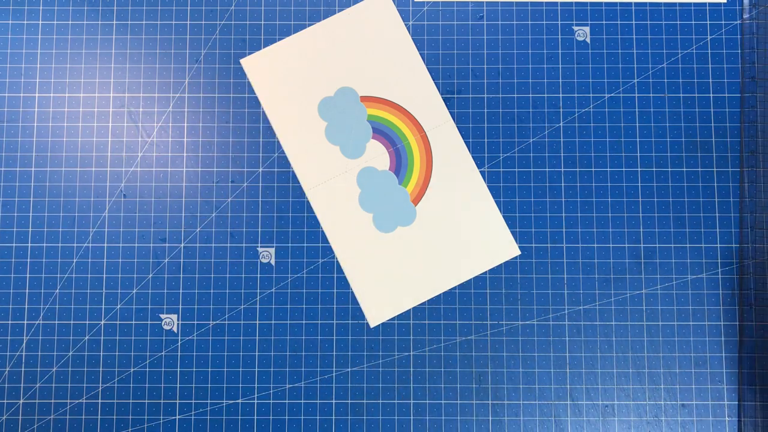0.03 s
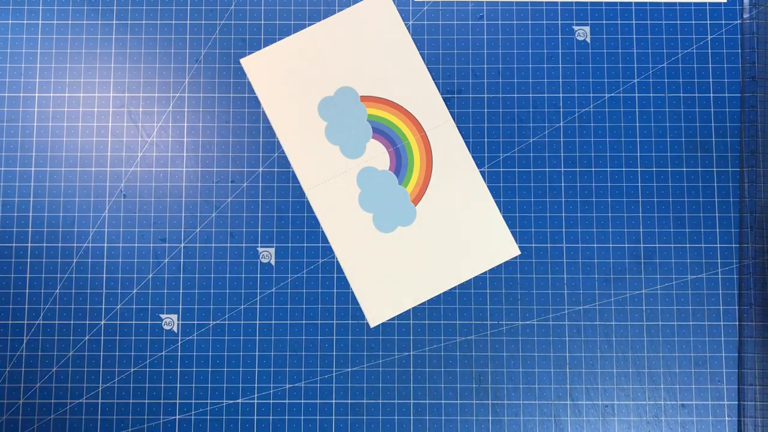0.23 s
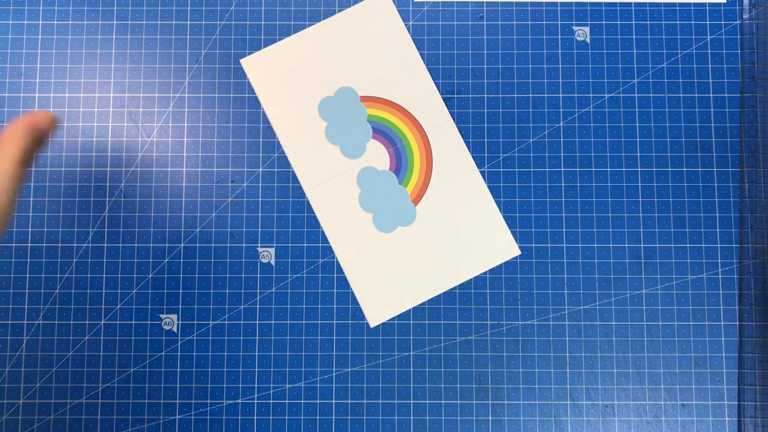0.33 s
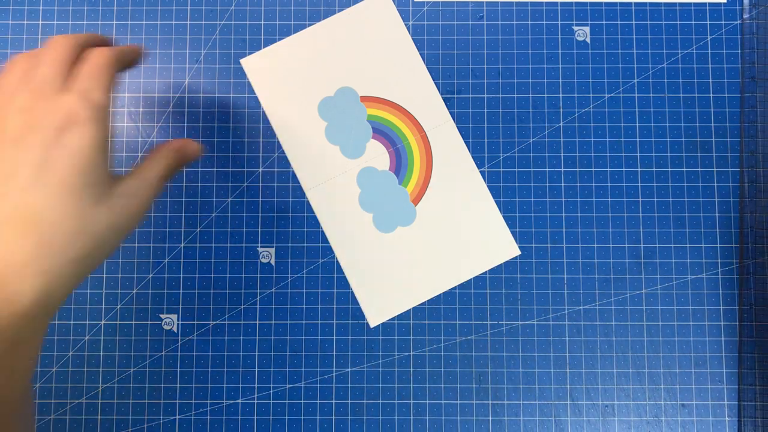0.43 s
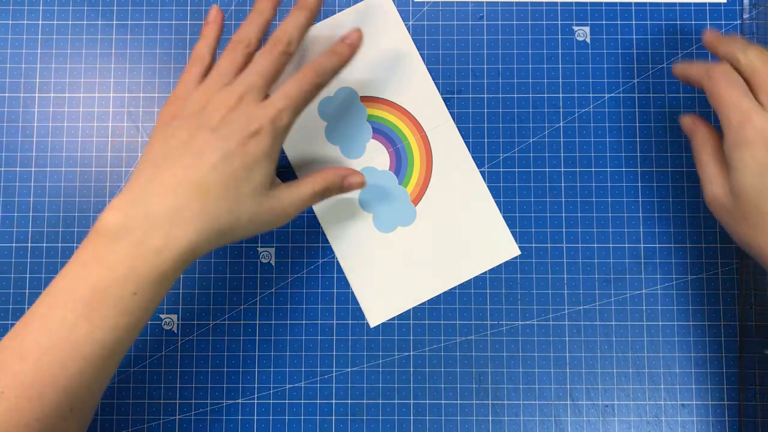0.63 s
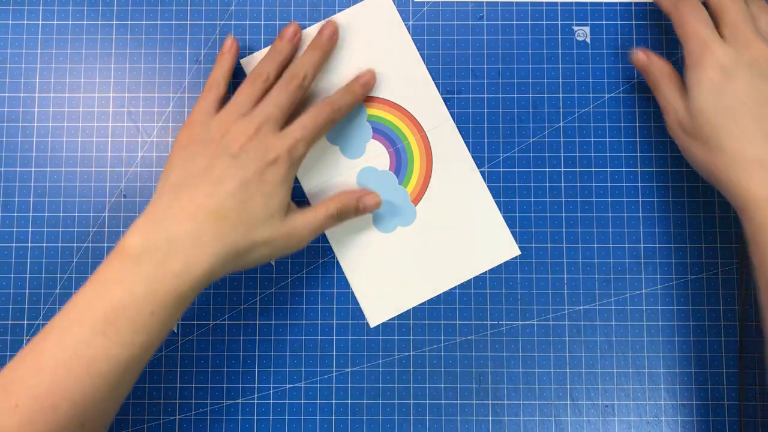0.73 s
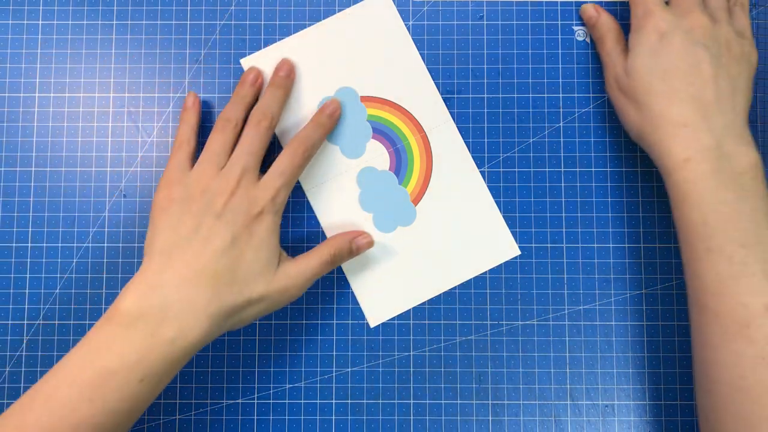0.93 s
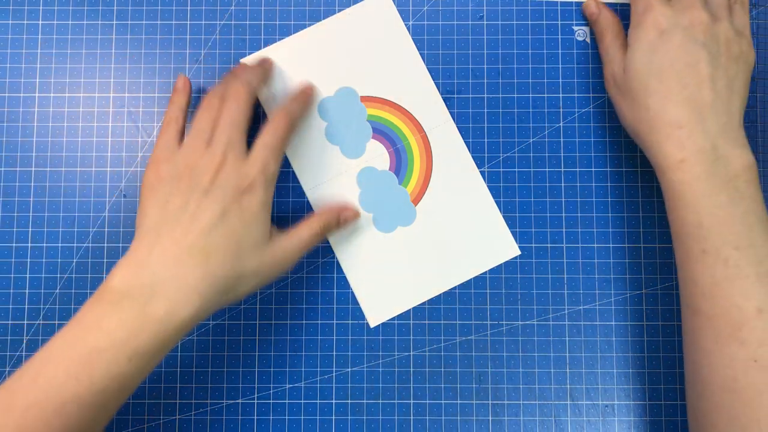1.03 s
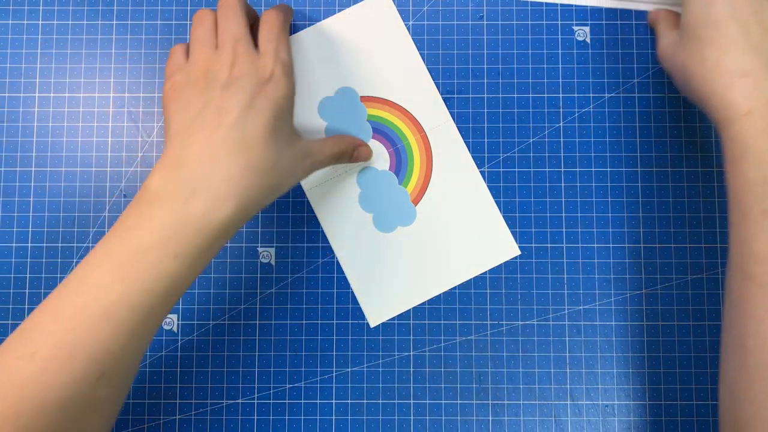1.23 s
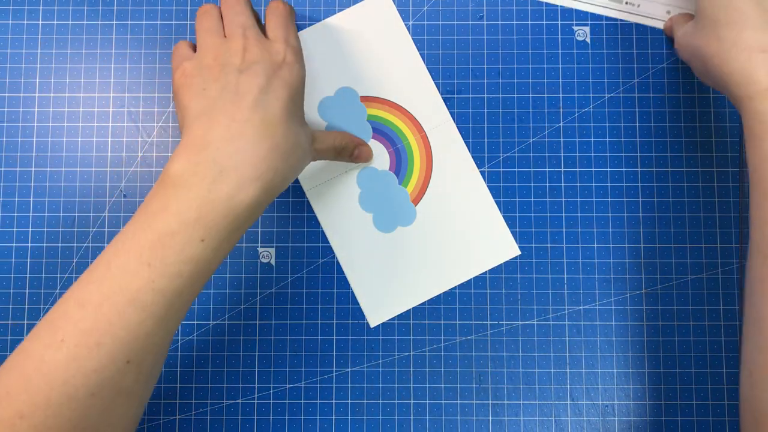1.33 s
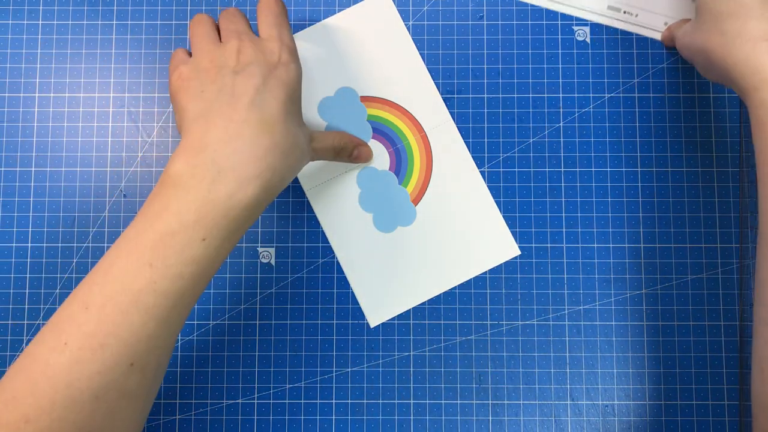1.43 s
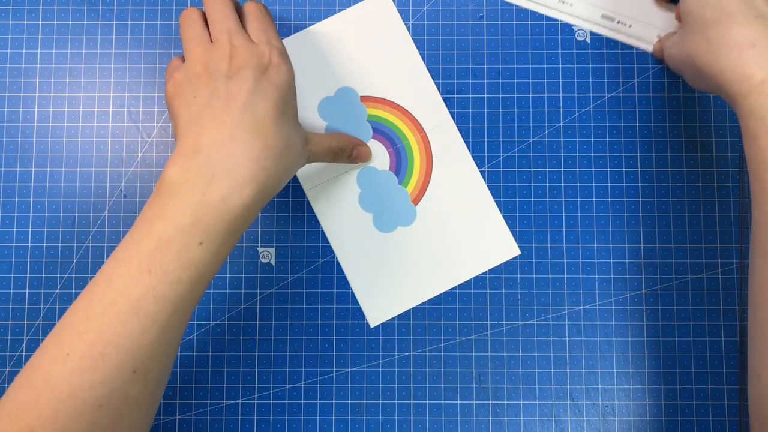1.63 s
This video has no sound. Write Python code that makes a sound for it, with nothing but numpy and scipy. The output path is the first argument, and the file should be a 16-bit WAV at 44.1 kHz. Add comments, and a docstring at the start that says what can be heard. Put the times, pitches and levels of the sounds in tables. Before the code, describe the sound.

A small hard object clicks in the fingers at 0.2 seconds, after a faint shuffle, snaps sharply onto a desk at 0.3 and settles with light taps around 0.4. From 0.8 a hand glides faintly over paper. From 1.2 to 1.7 a second sheet slides across a cutting mat, softly rustling and ticking. The microphone is close, with a low rumble in the small quiet room.

```python
"""A faint shuffle, then a small hard object clicks in the fingers, snaps down on the desk and settles.
The microphone is close above a cutting mat in a small quiet room. Each contact is a short crack;
the hardest set object and desk ringing. A hand then slides over a sheet of paper and a second sheet
is drawn in, its friction rustling, the paper ticking as it flexes. A low room rumble lies under it all."""
import sys
import numpy as np
from scipy import signal
from scipy.fft import rfft, irfft, next_fast_len
from scipy.io import wavfile
from scipy.ndimage import uniform_filter1d, map_coordinates

SR = 44100
rng = np.random.default_rng(int(sys.argv[2]) if len(sys.argv) > 2 else 0)


def to_wav(sig):
    """Store sig (one row per channel, or 1-D mono) as 16-bit WAV at the path in sys.argv[1].

    Samples outside -1..1 are clipped; the rate is SR.
    """
    pcm = np.clip(np.atleast_2d(sig), -1, 1) * 32767
    pcm = np.round(pcm).astype(np.int16)
    wavfile.write(sys.argv[1], SR, pcm.T)  # frames by channels


N = 74970

RUMBLE_COLOUR = [(25, -36.5), (45, -14.5), (65, -3), (95, -5), (160, -11.5), (255, -12.5), (400, -21),
                 (750, -30.5), (1500, -31), (3200, -35.5), (5300, -46), (15500, -46)]  # room tone: f/Hz, level/dB
ROOM_DECAY = [(150, 0.25), (400, 0.057), (1200, 0.15), (15000, 0.12)]  # reverberation of the small room: f/Hz, t60/s
# object, hands and arms bump the desk softly: t/s, level/dB, f/Hz, t60/s
DESK_BUMPS = [(0.212, -51, 83.4, 0.2), (0.2249, -36.5, 400, .035), (.2245, -37.5, 750.5, .024),
              (0.421, -54.5, 61, 0.44), (.485, -55, 63, 0.26), (0.504, -55, 436, 0.14),
              (.815, -45, 58.06, 0.11), (0.992, -57, 93.84, 0.36), (1.2266, -52, 288, .07),
              (1.327, -51.5, 302, 0.052), (1.356, -49, 259.3, 0.18), (1.357, -37.5, 450, 0.012),
              (1.449, -52, 55, .15), (1.558, -55.5, 416, 0.15)]

# Four rubbing sounds, each a stroke (t/s, level/dB) and a colour (f/Hz, level/dB).
# hand and paper shuffle on the mat
SHUFFLE_STROKE = [(0, -62.5), (.04, -66), (.07, -65), (.08, -52), (.11, -53), (.13, -61.5), (.147, -52.5),
                  (.17, -58.5), (.185, -59), (.21, -59.5), (.3, -75), (.43, -61.5), (.52, -70.5),
                  (.58, -80)]
SHUFFLE_COLOUR = [(120, -35), (230, -16), (310, 0), (490, -15), (585, -1.5), (840, -9), (1300, -14),
                  (1550, -11), (2300, -21.5), (3300, -15.5), (6600, -18), (7600, -22.5), (15500, -29.5)]
# fingers glide on paper
GLIDE_STROKE = [(.78, -92.5), (.81, -65), (.87, -60), (.94, -59.5), (1.03, -67), (1.1, -66.5), (1.2, -71),
                (1.3, -90.5)]
GLIDE_COLOUR = [(880, -39.5), (1500, -18), (2570, -14), (4310, -7.5), (4660, -8), (6960, -5), (7670, -9),
                (9330, -5.5), (15500, -1.5)]
# the second sheet scrapes dully
SCRAPE_STROKE = [(1.2, -93), (1.23, -65), (1.3, -63), (1.36, -64.5), (1.41, -65.5), (1.44, -70.5),
                 (1.465, -60.5), (1.49, -69), (1.515, -58), (1.54, -64.5), (1.57, -63.5), (1.65, -68),
                 (1.69, -58.5)]
SCRAPE_COLOUR = [(100, -14.5), (240, 0), (430, -5), (800, -18), (1400, -11), (2500, -18.5), (3700, -17),
                 (6000, -26), (15000, -39)]
# it hisses as it skims the mat
SKIM_STROKE = [(1.2, -81), (1.27, -71), (1.32, -62.5), (1.36, -58), (1.42, -70), (1.47, -69),
               (1.515, -57.5), (1.55, -68.5), (1.585, -62), (1.63, -81.5), (1.7, -72.5)]
SKIM_COLOUR = [(1500, -25.5), (4500, -6.5), (7000, -8.5), (10500, -8), (12500, -1), (14000, -3),
               (15500, -3.5)]

# paper ticks and finger taps: t/s, level/dB at each of the four TICK_BANDS, t60/s
PAPER_TICKS = [(.075, -47, -47.5, -46, -52, 0.026), (0.8083, -70, -62, -60.5, -49.5, 0.022),
               (1.2265, -48, -55, -65, -74, .03), (1.326, -39, -50, -52, -63, 0.033),
               (1.3566, -43, -50, -54, -53, 0.011), (1.3746, -38, -52, -45.5, -54, 0.045),
               (1.4569, -39.5, -47, -53, -50.5, 0.028), (1.5594, -55, -55, -56, -68, 0.033),
               (1.5823, -50, -48.5, -45, -48, .015), (1.6862, -47, -54.5, -59.5, -55, .02)]
TICK_BANDS = [300, 1400, 4300, 11000]  # f/Hz
SHEET_COLOUR = [(40, -16), (150, -3), (300, 4.5), (850, -1), (1250, 5), (2400, -4), (3750, 1), (4350, 7),
                (5300, -5), (11000, -2)]  # the sheet's own colour, added to each tick: f/Hz, level/dB
PAPER_PINGS = [(.549, -48.5, 3090), (.659, -59, 3150), (.709, -51.5, 3149), (1.3754, -41.5, 4270),
               (1.5825, -43, 4060)]  # narrow pings of flexed paper: t/s, level/dB, f/Hz

# light, papery taps as the object settles: t/s, level/dB, tilt/(dB per octave)
SETTLING_TAPS = [(0.4045, -34.5, -0.5), (.408, -41.5, -5), (0.4217, -31, -1.5), (0.4250, -37.5, -3),
                 (0.433, -44, -2.5)]
TAP_COLOUR = [(100, -26), (450, -7), (880, -20), (1280, -5.5), (2100, -7.5), (3130, 0.5), (4150, -0.5),
              (5400, -6), (8100, 2.5), (9800, -7.5), (16000, -6)]  # f/Hz, level/dB
# hollow clack of the object in the fingers: t/s, level/dB, tilt/(dB per octave)
FINGER_CLICKS = [(0.2109, -53, -4.5), (0.2222, -18.5, -1.5), (.2258, -29, -2), (.2318, -35, -2)]
CLICK_COLOUR = [(100, -18), (260, -14), (390, -6.5), (530, -13), (750, -5), (930, -12.5), (1400, -25.5),
                (1680, -4), (1880, -15.5), (2100, -6.5), (2380, -12), (2900, 0), (3650, -5.5), (4200, 5),
                (4900, -1), (5500, -11.5), (6100, -2.5), (7200, 1), (9500, -5.5), (16000, -10.5)]  # f/Hz, level/dB
# the object strikes the desk: t/s, level/dB, thump/dB, tilt/(dB per octave)
DESK_KNOCKS = [(0.2885, -18, -3, -2.5), (.2902, -10.5, -3, 0), (0.2933, -20.5, -3, 1.5),
               (0.3297, -30, 8.5, -1.5), (0.335, -28.5, -7, 2)]
KNOCK_COLOUR = [(40, -27), (130, -13.5), (285, -7), (345, 3), (450, -4.5), (590, 3.5), (830, -4.5),
                (1070, 3), (1350, -2.5), (1600, -1.5), (2050, -6.5), (2660, 4.5), (3000, -2.5), (3300, 3),
                (3900, -2.5), (5100, 3), (5800, -2.5), (7700, -3), (10000, -.5), (16000, -10)]  # f/Hz, level/dB
# what object and desk ring with: f/Hz, relative level/dB, t60/s
DESK_MODES = [(150, -18.5, .14), (225, -10.5, 0.099), (340.3, -5, .135), (365.3, -10.5, .15),
              (583, -5.5, 0.072), (780.3, -7.5, .07), (1053, -12, 0.092), (1154, -9.5, .1), (1617, -13, .1),
              (2642, 1.5, .1), (3200, -5.5, .09), (3650, -6, 0.12), (4350, -6, .12), (5240, -4, 0.15)]

FILTER_SIZE, GRAINS_PER_S = 8192, 2100


def amp(db):
    """Decibels to gain."""
    return 10 ** (np.asarray(db) / 20)


def unit(x):
    """Scale to rms 1."""
    return x / np.sqrt(np.mean(x ** 2) + 1e-20)


def freqs(size=FILTER_SIZE):
    """The frequency grid of a filter."""
    return np.fft.rfftfreq(size, 1 / SR)


def along(points, hz):
    """Interpolate (f/Hz, value) points on a log frequency axis."""
    f, values = np.transpose(points)
    return np.interp(np.log(hz + 1), np.log(f + 1), values)


def tilt(db_per_octave):
    """A treble slope in dB, pivoting at 4 kHz and level below 500 Hz."""
    return db_per_octave * np.log2(np.maximum(freqs(), 500) / 4000)


def wobble(rate):
    """A smooth random curve, rate knots a second."""
    knots = rng.standard_normal(int(N * rate / SR) + 4)
    return map_coordinates(knots, [np.arange(N) * rate / SR])


def delayed(x, start):
    """x placed at start seconds, over the whole length of the scene."""
    return np.pad(x, (max(round(start * SR), 0), N))[:N]


def noise(colour):
    """Steady coloured noise of rms 1."""
    size = next_fast_len(N)
    spectrum = rfft(rng.standard_normal(size)) * amp(along(colour, freqs(size)))
    return unit(irfft(spectrum, size)[:N])


def coloured(x, gain_db):
    """Minimum-phase filter: nothing sounds ahead of the attack."""
    cepstrum = irfft(np.log(amp(gain_db) + 1e-6))
    cepstrum[1:FILTER_SIZE // 2] *= 2
    cepstrum[FILTER_SIZE // 2 + 1:] = 0
    return irfft(rfft(x, FILTER_SIZE) * np.exp(rfft(cepstrum)))


def room_tone(rumble_db=-63, hum_db=-69, hum_hz=100):
    """The bed of the quiet room: low rumble and a wavering hum."""
    phase = 2 * np.pi * hum_hz * np.arange(N) / SR + 0.33 * wobble(2.0)
    hum = np.sin(phase) * amp(3.3 * wobble(3.5))
    return amp(rumble_db) * noise(RUMBLE_COLOUR) + amp(hum_db) * unit(hum)


def in_room(x, wet_db, gap_s=.004):
    """The direct sound reaches the microphone first, then the room's diffuse answer."""
    hz, t, bands = signal.stft(rng.standard_normal(SR // 2), SR, nperseg=256)
    decay = amp(-60 * t / along(ROOM_DECAY, hz)[:, None])
    tail = signal.istft(bands * decay, SR, nperseg=256)[1]
    reverb = signal.fftconvolve(x, tail / np.linalg.norm(tail))
    return delayed(x, 0) + amp(wet_db) * delayed(reverb, gap_s)


def desk_bumps():
    """The desk booms faintly when touched or leant on."""
    t, out = np.arange(N) / SR, np.zeros(N)
    for start, db, hz, t60 in DESK_BUMPS:
        attack = 1 - np.exp(-t * hz)  # rises in about one cycle
        out += delayed(amp(db - 60 * t / t60) * attack * np.sin(2 * np.pi * hz * t), start)
    return out


def rub(stroke, colour, grain_db):
    """Friction: a hiss broken into tiny slips, following the level of the stroke."""
    times, db = np.transpose(stroke)
    slips = unit(noise(colour) * amp(grain_db * wobble(GRAINS_PER_S)))
    return amp(np.interp(np.arange(N) / SR, times, db)) * slips


def hands(stick_db=2.1, sticks_per_s=130):
    """A hand catches and slips on the mat, then glides over the paper."""
    catching = amp(stick_db * wobble(sticks_per_s))
    shuffle = catching * rub(SHUFFLE_STROKE, SHUFFLE_COLOUR, grain_db=3.0)
    return shuffle + rub(GLIDE_STROKE, GLIDE_COLOUR, grain_db=1.5)


def second_sheet():
    """Paper drawn across the mat: a dull scrape under a bright hiss."""
    scrape = rub(SCRAPE_STROKE, SCRAPE_COLOUR, grain_db=1.37)
    return scrape + rub(SKIM_STROKE, SKIM_COLOUR, grain_db=3.5)


def crack(colour_db, t60, spike_db=-2, spike_t60=.0066):
    """One contact: a spike at the first instant over dense, quickly dying vibration."""
    t = np.arange(SR // 8) / SR
    fade = amp(-60 * t / t60) + amp(spike_db - 60 * t / spike_t60)
    x = rng.standard_normal(len(t)) * fade
    for _ in range(3):  # even out the spectrum, then restore the fade
        x = irfft(np.exp(1j * np.angle(rfft(x))), len(t))
        local_rms = np.sqrt(np.abs(uniform_filter1d(x ** 2, size=45)) + 1e-12)
        x = x * fade / local_rms
    return coloured(x, colour_db)


def paper_ticks(ping_width_octaves=.17):
    """Paper and fingertips tick; the flexing sheet pings in a narrow band."""
    out = np.zeros(N)
    for start, *levels, t60 in PAPER_TICKS:
        colour = along(list(zip(TICK_BANDS, levels)), freqs()) + along(SHEET_COLOUR, freqs())
        out += delayed(crack(colour, t60), start)
    for start, db, hz in PAPER_PINGS:
        octaves_off = np.log2((freqs() + 1) / hz)
        band_db = -10 * np.log10(1 + (octaves_off / ping_width_octaves) ** 4)
        out += amp(db) * delayed(crack(band_db, t60=.024), start)
    return in_room(out, wet_db=-12.5)


def object_clicks(contacts, colour, t60):
    """Light contacts of the hard object: bright, short and without a ring."""
    out = np.zeros(N)
    for start, db, slope in contacts:
        click = crack(along(colour, freqs()) + tilt(slope), t60)
        out += amp(db) * delayed(in_room(click, wet_db=-9), start)
    return out


def desk_ring(ring_db=-20, attack_s=.0018, blur_rad=.5, blur_per_s=160):
    """Every knock feeds the same modes of object and desk, each slightly blurred in phase."""
    t, out = np.arange(N) / SR, np.zeros(N)
    blows = [(np.maximum(t - start, 0), db) for start, db, *_ in DESK_KNOCKS]
    for hz, mode_db, t60 in DESK_MODES:
        energy = sum((np.minimum(age / attack_s, 1) * amp(db - 60 * age / t60)) ** 2
                     for age, db in blows)
        blur = blur_rad * min(hz / 2000, 1) * wobble(blur_per_s)
        tone = np.sin(2 * np.pi * (hz * t + rng.random()) + blur)
        out += amp(ring_db + mode_db) * np.sqrt(energy) * tone
    return out


def object_knocks(thump_hz=604):
    """The snap just below the microphone: each blow cracks and thumps the desk."""
    out = np.zeros(N)
    for start, db, thump_db, slope in DESK_KNOCKS:
        thump = thump_db / (1 + (freqs() / thump_hz) ** 2)
        knock = crack(along(KNOCK_COLOUR, freqs()) + tilt(slope) + thump, t60=.03)
        out += amp(db) * delayed(in_room(knock, wet_db=-8.5), start)
    return out


def scene(echo_s=.00063, echo_db=-17.5):
    """One close microphone above the mat: contacts and rustles over the room tone."""
    contacts = object_knocks() + desk_ring()
    contacts += object_clicks(FINGER_CLICKS, CLICK_COLOUR, t60=.019)
    contacts += object_clicks(SETTLING_TAPS, TAP_COLOUR, t60=.023)
    contacts += paper_ticks()
    reflection = amp(echo_db) * delayed(contacts, echo_s)  # off a nearby surface
    return (contacts + reflection + desk_bumps() + hands() + second_sheet() + room_tone())[None]


def record(dry):
    """The recorder keeps nothing above its band limit."""
    top_hz = 15900
    spectrum = rfft(dry, 2 * N) / (1 + (freqs(2 * N) / top_hz) ** 160)
    return irfft(spectrum, 2 * N)[:, :N]


dry = scene()
out = record(dry)
to_wav(out)
```